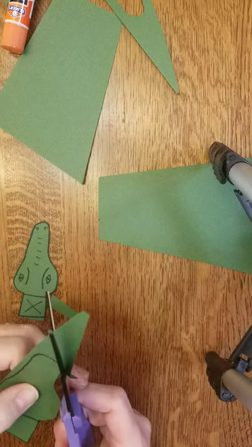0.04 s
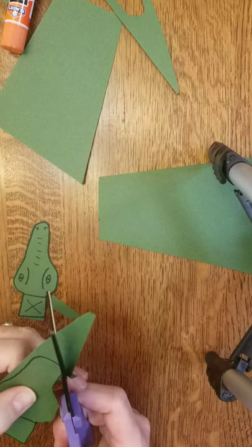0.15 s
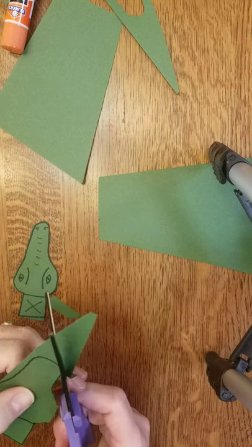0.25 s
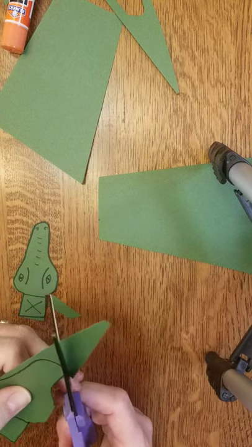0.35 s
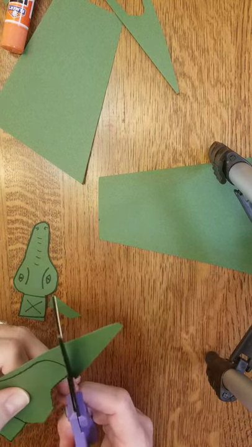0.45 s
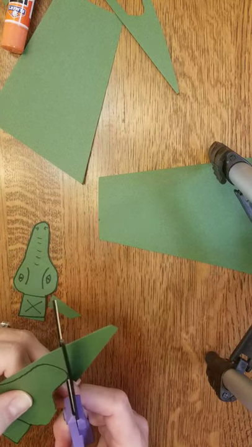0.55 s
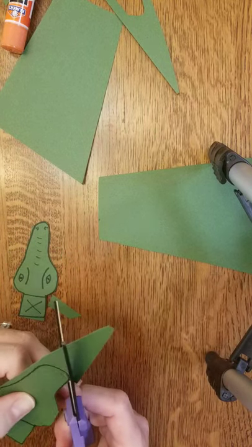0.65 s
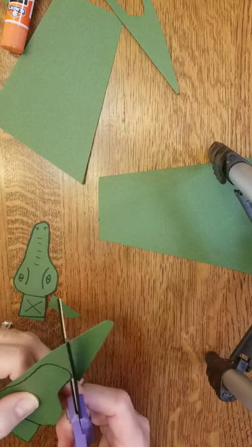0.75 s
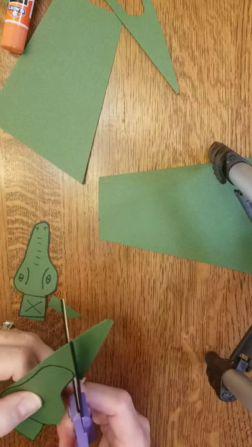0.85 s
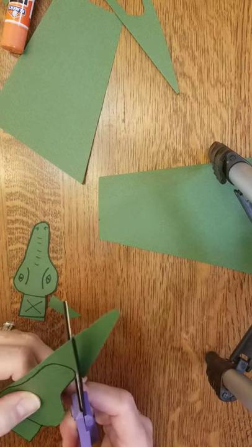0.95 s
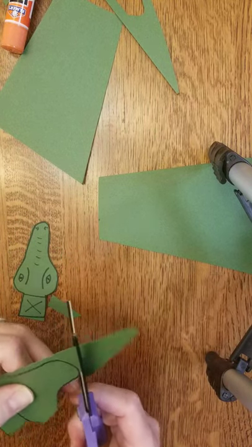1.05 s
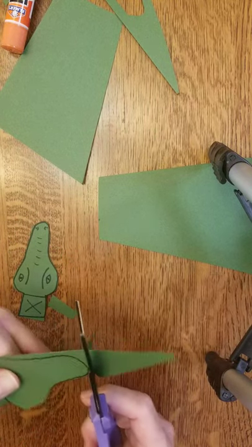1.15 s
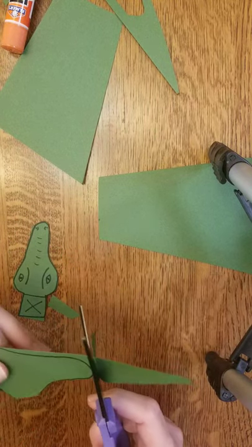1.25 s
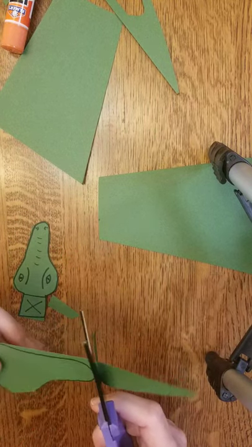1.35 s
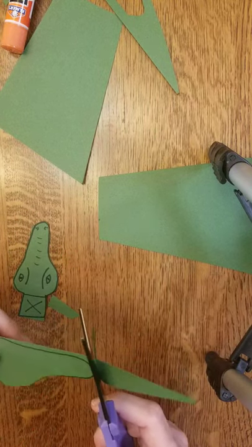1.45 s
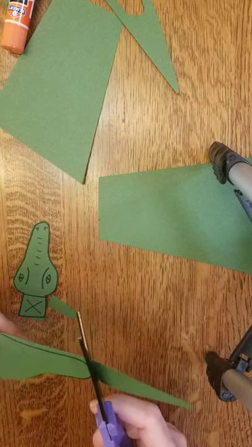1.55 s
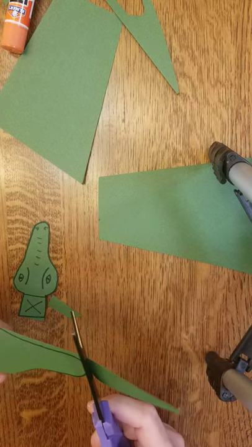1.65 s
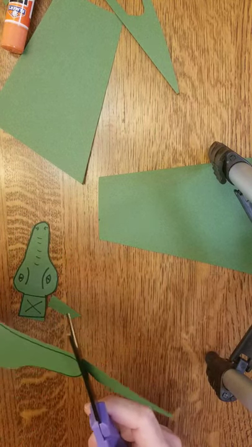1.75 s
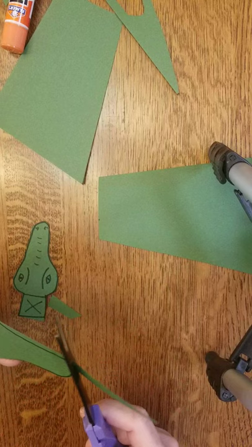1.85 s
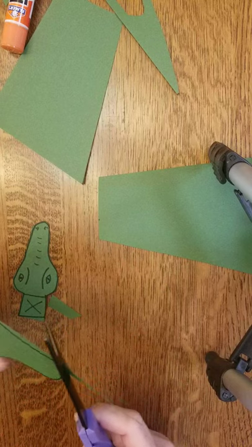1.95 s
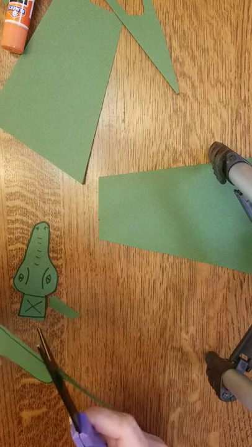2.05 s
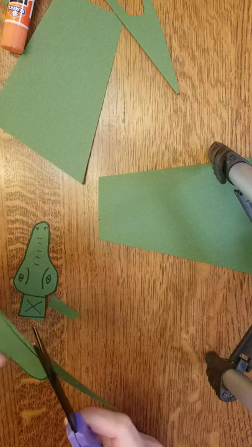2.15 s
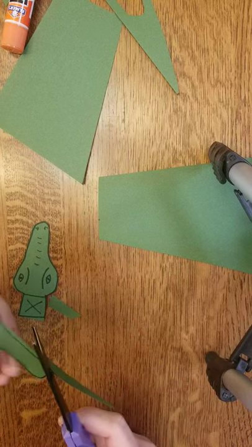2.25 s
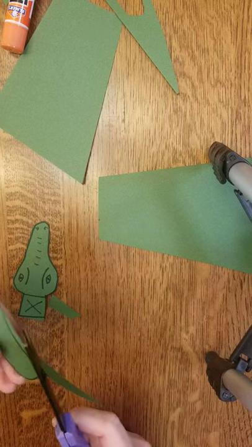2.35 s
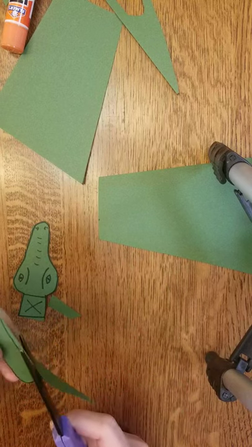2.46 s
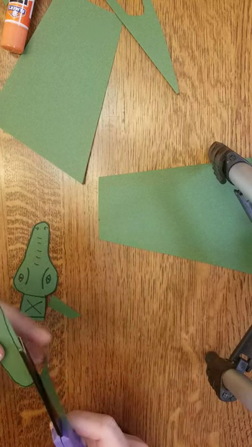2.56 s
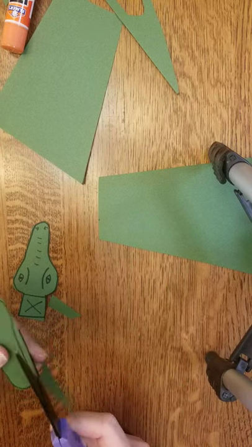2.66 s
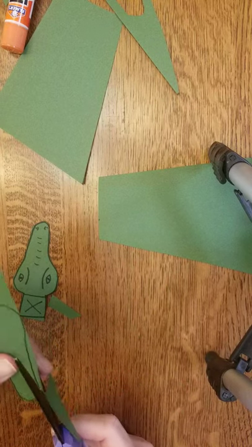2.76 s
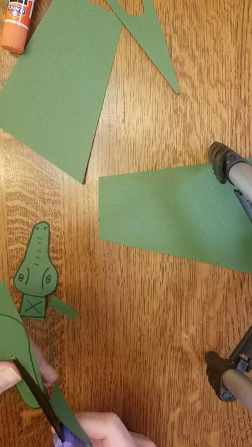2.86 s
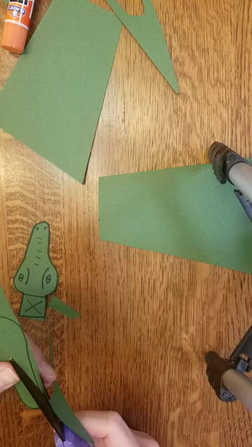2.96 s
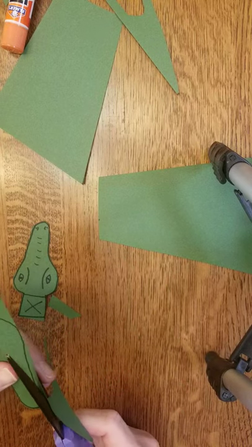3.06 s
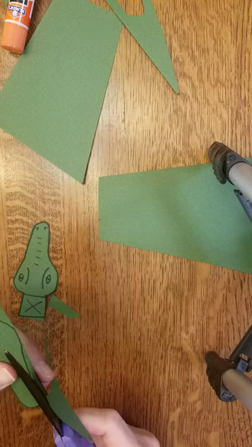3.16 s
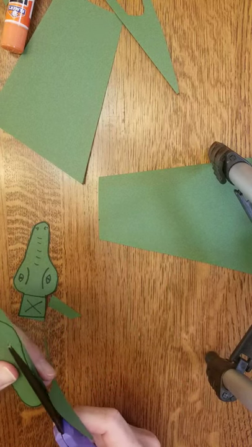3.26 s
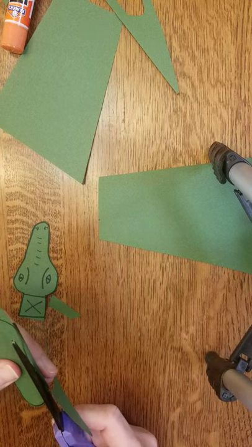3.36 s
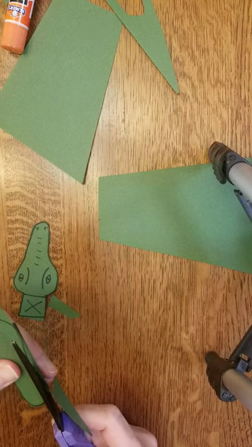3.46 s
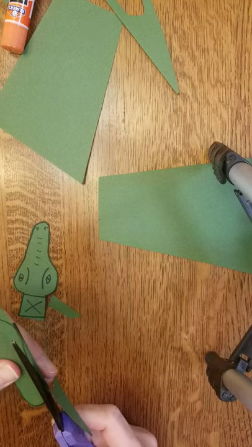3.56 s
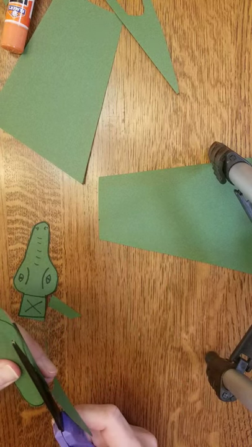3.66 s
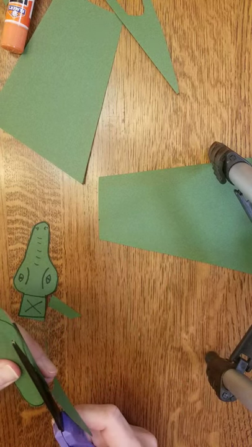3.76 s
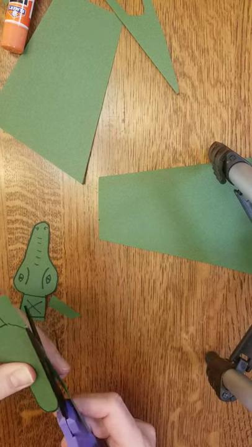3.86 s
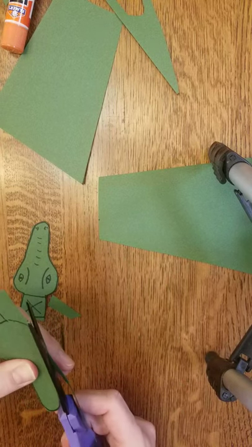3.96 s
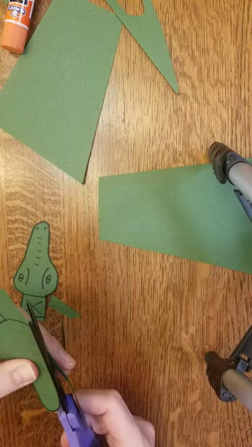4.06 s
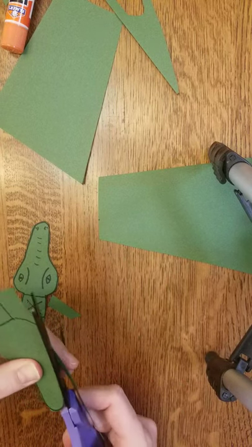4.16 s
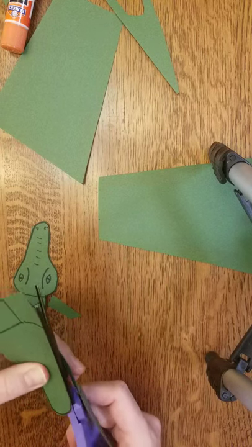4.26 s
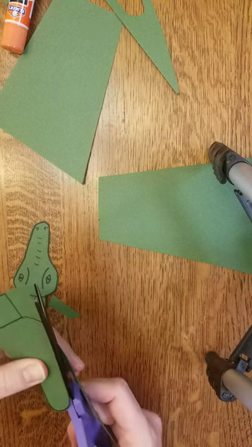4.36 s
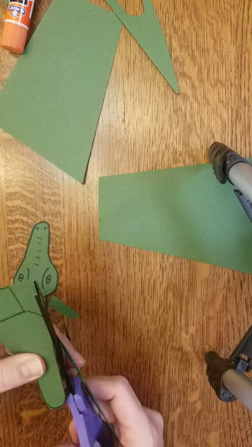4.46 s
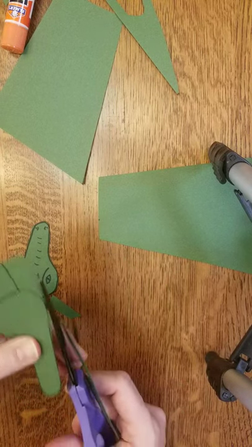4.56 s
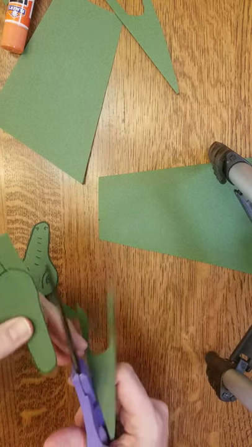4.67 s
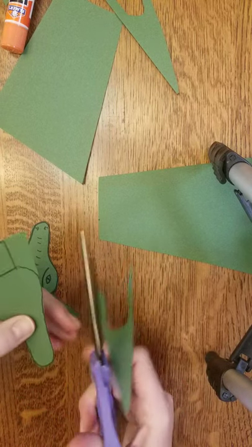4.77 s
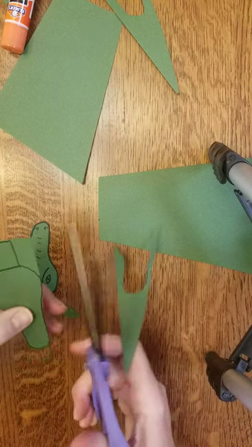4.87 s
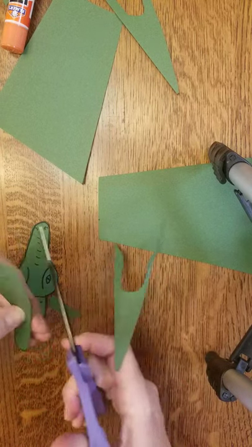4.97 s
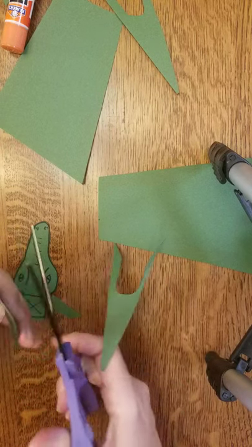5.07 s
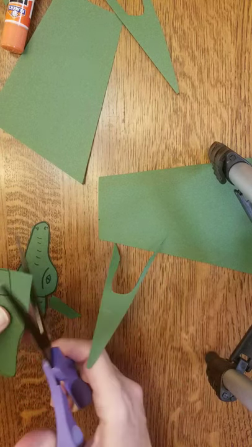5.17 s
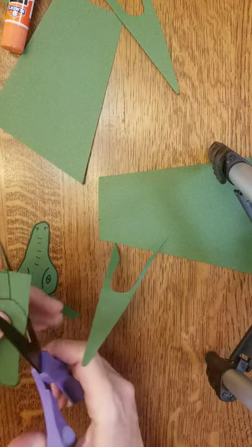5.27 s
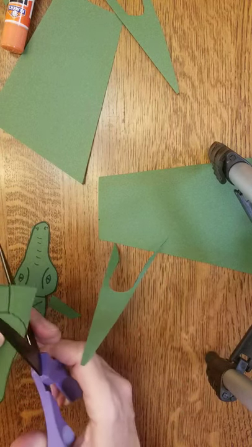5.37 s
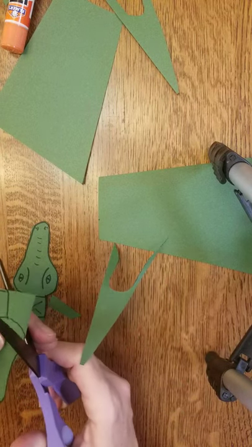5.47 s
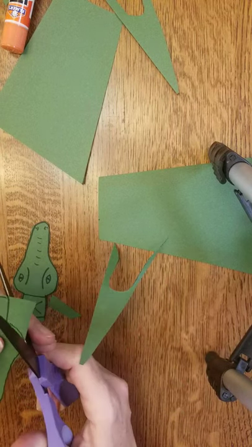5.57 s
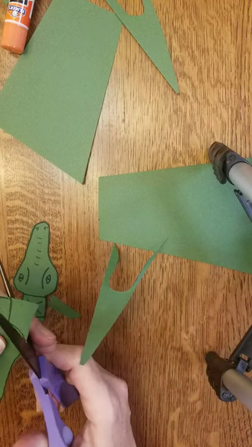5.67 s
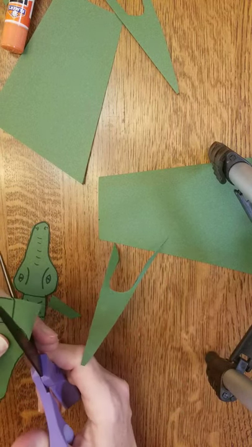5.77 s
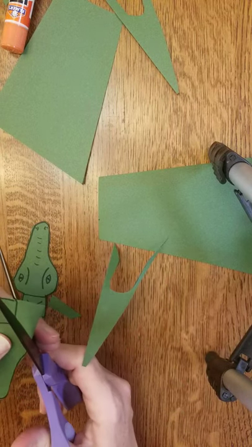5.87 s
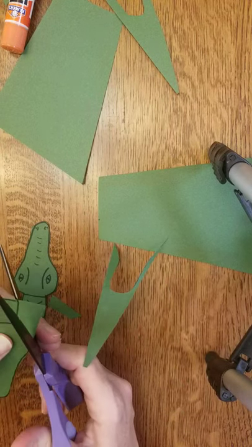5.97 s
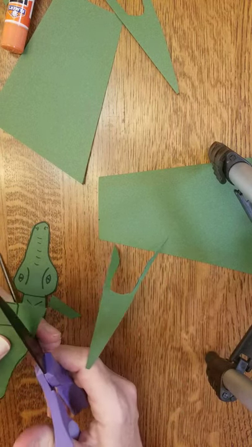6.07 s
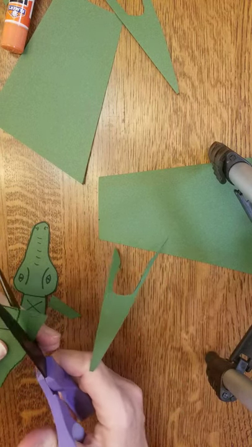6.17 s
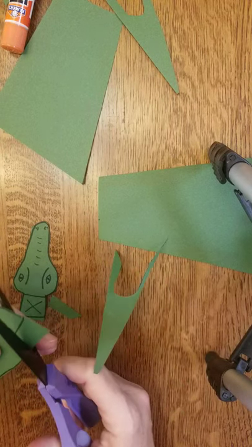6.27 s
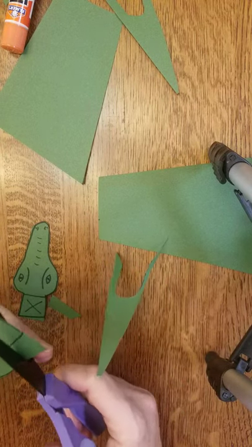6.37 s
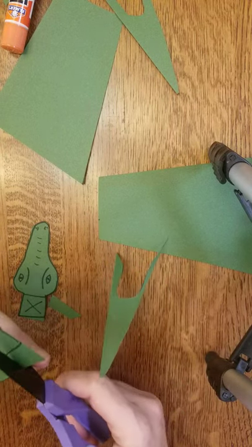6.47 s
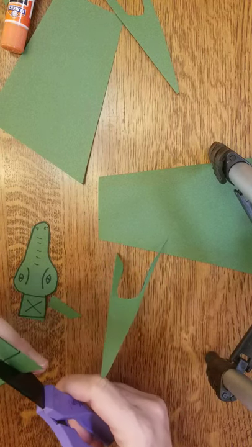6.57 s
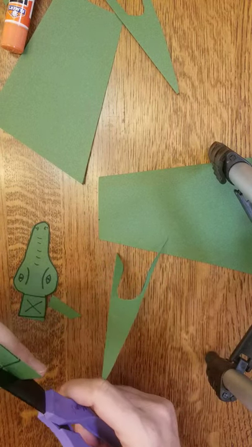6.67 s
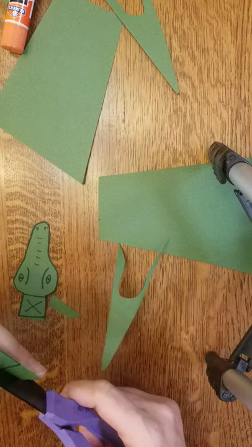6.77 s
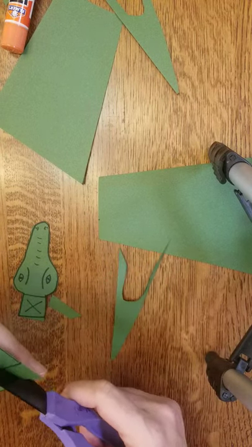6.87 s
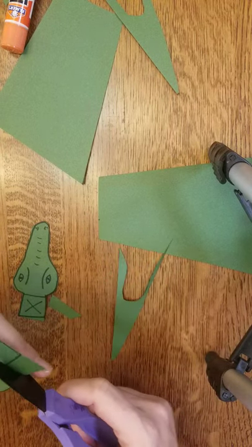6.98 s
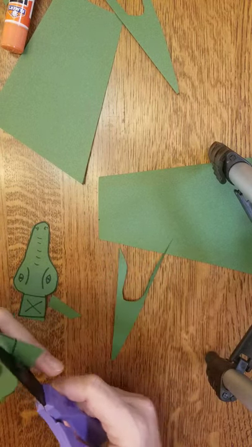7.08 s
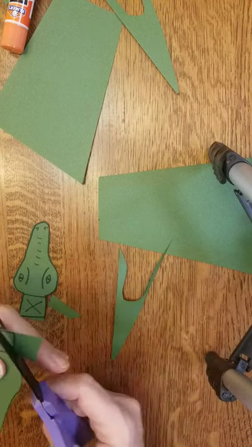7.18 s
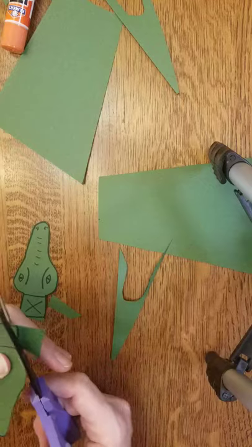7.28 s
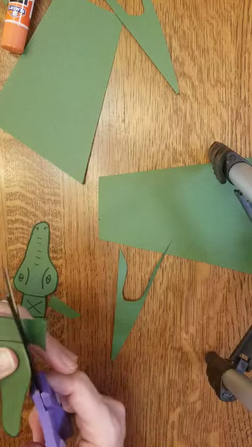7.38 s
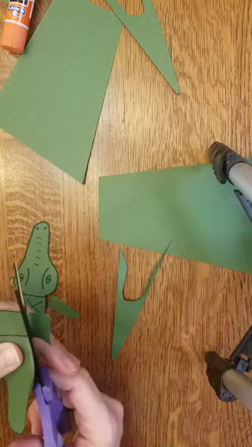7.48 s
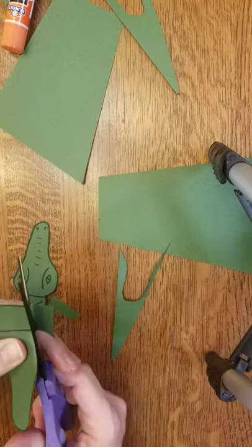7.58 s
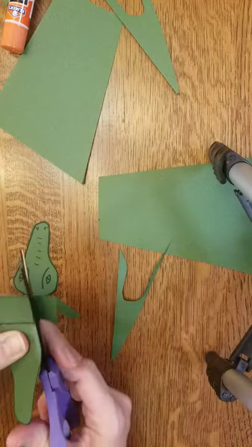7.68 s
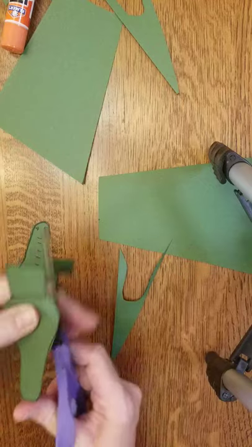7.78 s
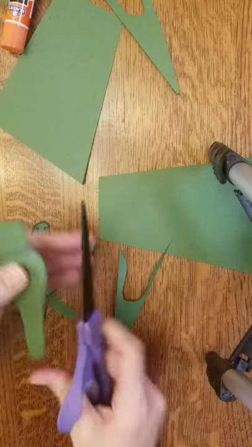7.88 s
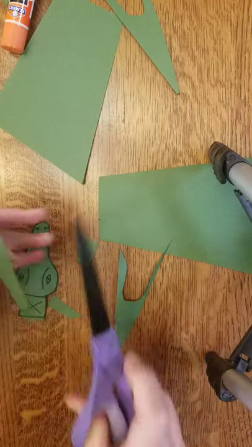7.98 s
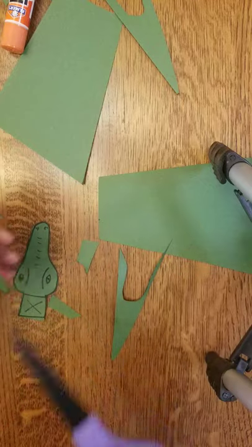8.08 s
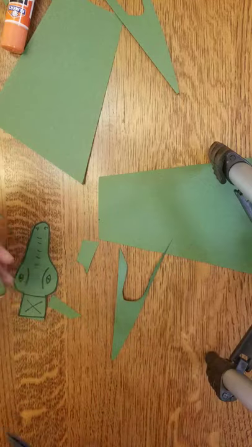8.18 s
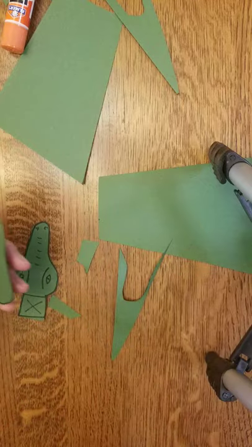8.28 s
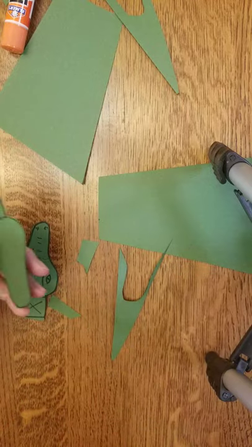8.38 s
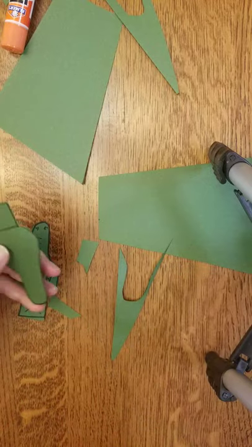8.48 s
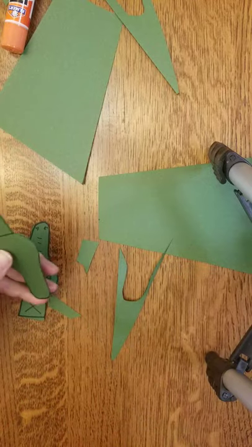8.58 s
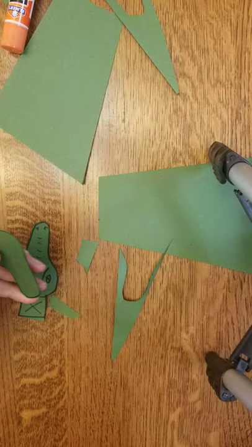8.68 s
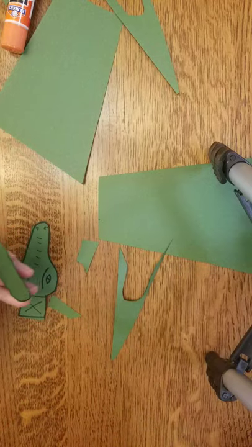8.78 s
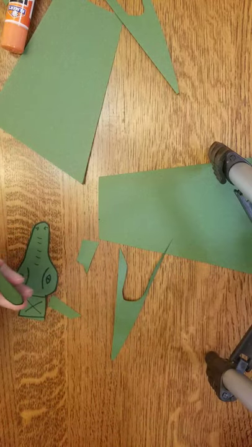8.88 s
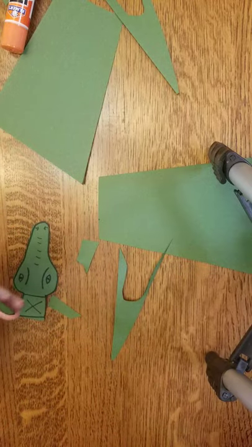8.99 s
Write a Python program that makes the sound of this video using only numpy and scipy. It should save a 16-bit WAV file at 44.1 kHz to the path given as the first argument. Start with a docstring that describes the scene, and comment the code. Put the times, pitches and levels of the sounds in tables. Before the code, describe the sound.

Close stereo pickup in a small, quiet room with a low motor hum and soft hiss. Scissors trim stiff craft paper slightly left of centre: crisp short snips, papery slides, finger strokes and small hollow pops as the sheet buckles. A dry click marks the blades shutting. After a pause and a last run of cuts, the scissors are laid on the wooden table with a knock and a much louder clatter, then a hand brushes the wood.

```python
"""A low hum and the faint rustle of a held sheet come first, in a small room; then scissors trim craft paper.
Short snips are dense clusters of snapping fibres; between them blades and fingers slide as shaped noise.
The sheet buckles with hollow pops made of short tones, and the blades shut with a dry click.
At the end the scissors are put down: a knock, then a louder clatter of noise bursts and ringing
table tones, and a hand brushes the table with a dull noise."""
import sys
import numpy as np
from scipy import signal
from scipy.fft import rfft, irfft
from scipy.io import wavfile

SR = 44100
rng = np.random.default_rng(int(sys.argv[2]) if len(sys.argv) > 2 else 0)


def unload_wav(signal):
    """Save mono or channel-first audio to the path in sys.argv[1] as 16-bit WAV at rate SR, clipped to [-1, 1]."""
    wavfile.write(
        sys.argv[1],
        SR,
        np.round(np.clip(np.atleast_2d(signal).T, -1, 1) * 32767).astype(np.int16),
    )


N = 397782
TIME = np.arange(N) / SR


def from_db(db):
    """Turn decibels into a gain."""
    return 10 ** (np.asarray(db) / 20)


def rms_one(x):
    """Scale a sound to an average power of 1."""
    return x / np.sqrt(np.mean(x ** 2) + 1e-20)


def in_time(rows):
    """Draw straight lines between the rows of a table, giving each column at every sample."""
    seconds, *columns = np.transpose(rows)
    return [np.interp(TIME, seconds, column) for column in columns]


def at_hz(points, hz):
    """Read a table between its rows, with pitch spaced as the ear hears it (logarithmically)."""
    f, value = np.transpose(points)
    return np.interp(np.log(np.maximum(hz, 1)), np.log(f), value)


def pan(left_db):
    """Gains of left and right that differ by this many dB; positive leans left."""
    return from_db(np.array([[left_db], [-left_db]]) / 2)


def band(x, low, high, order=3):
    """Keep only the range between two pitches in Hz."""
    sos = signal.butter(order, [low, min(high, .45 * SR)], "band", fs=SR, output="sos")
    return signal.sosfilt(sos, x)


def convolve(x, response):
    """Pass a sound through an impulse response, channel by channel."""
    return signal.fftconvolve(np.atleast_2d(x), np.atleast_2d(response), axes=1)[:, :N]


def colour(x, spectrum, size=4096):
    """Filter with the given spectrum, without sound ahead of time; white noise keeps its power."""
    hz = np.arange(size // 2 + 1) * SR / size
    cepstrum = irfft(np.log(from_db(at_hz(spectrum, hz))))
    # folding the cepstrum makes the filter respond as early as possible (minimum phase)
    cepstrum[1:size // 2] *= 2
    cepstrum[size // 2 + 1:] = 0
    response = irfft(np.exp(rfft(cepstrum)))
    return convolve(x, response / np.linalg.norm(response))


def drift(rate):
    """A random line with this many new targets per second and an average power of 1."""
    knots = np.arange(0, N / SR + 1, 1 / rate)
    return rms_one(np.interp(TIME, knots, rng.standard_normal(len(knots))))


def stereo_noise(likeness):
    """White noise; likeness is the share of power common to both channels."""
    shared = np.clip(likeness, 0, 1)
    common = np.sqrt(shared) * rng.standard_normal(N)
    return common + np.sqrt(1 - shared) * rng.standard_normal((2, N))


# Hum of a motor in the room. Each row: pitch in Hz, level in dB before wavering and panning.
HUM = [(59.4, -86), (118.8, -76.5), (150, -75.5), (180, -72.5), (210, -82.5), (239, -79.5), (571, -89.5),
       (1152, -93.5)]
# Colour of the room's rumble and hiss. Each row: pitch in Hz, relative level in dB per Hz.
ROOM_NOISE = [(20, -33), (50, 0.5), (100, -6.5), (170, -2.5), (240, -5), (330, -13.5), (550, -18.5),
              (850, -24.5), (1100, -21), (1700, -24), (3200, -24), (6000, -32.5), (9000, -48),
              (13000, -19.5), (16000, -28.5)]


def background(waver_db=3.0, noise_db=-67, split_hz=900):
    """Steady tones waver in level and phase over a shared rumble and a hiss that differs on each side."""
    hum = 0
    for hz, db in HUM:
        level = from_db(db + waver_db * drift(6.2))
        phase = 2 * np.pi * hz * TIME + 0.82 * drift(4.4)
        hum = hum + level * np.sqrt(2) * np.sin(phase)
    low = signal.butter(2, split_hz, fs=SR, output="sos")
    high = signal.butter(2, split_hz, "high", fs=SR, output="sos")
    rumble = signal.sosfilt(low, stereo_noise(likeness=0.69)) * pan(13.0)
    hiss = signal.sosfilt(high, stereo_noise(likeness=0.038)) * pan(1.0)
    return hum * pan(13.2) + from_db(noise_db) * colour(rumble + hiss, ROOM_NOISE)


# Hands shifting on the table edge. Each row: time in seconds, level in dB before panning.
HANDLING = [(0, -76), (3.72, -76.5), (3.83, -60), (3.98, -71), (6.55, -91), (6.85, -67), (7.2, -68),
            (7.65, -58), (7.9, -65), (8.3, -65.5), (9.02, -65)]
# Colour of that rumble. Each row: pitch in Hz, relative level in dB per Hz.
HANDLING_COLOUR = [(30, 5), (55, 2.5), (110, 5.5), (200, -3.5), (400, -11), (650, -24.5), (2000, -45)]


def handling():
    """Hands and wrists rumble softly through the table, as dark noise that swells and fades."""
    level_db, = in_time(HANDLING)
    return from_db(level_db) * colour(stereo_noise(likeness=0.83), HANDLING_COLOUR) * pan(13.8)


# Time for the room to die away. Each row: pitch in Hz, time in seconds to fall by 60 dB.
ROOM_T60 = [(100, 0.58), (700, 0.79), (2500, 0.48), (6000, 0.39), (15000, 0.41)]


def room(x, first_echo_s=0.0081, alike_below_hz=400, count=9):
    """Blurred reflections start after the nearest wall, with their own decay in each pitch range;
    both sides are more alike in the bass."""
    age = TIME[:SR * 3 // 4]
    edges = np.geomspace(60, 18000, count)
    tail = 0
    for low, high in zip(edges, edges[1:]):
        hz = np.sqrt(low * high)
        noise = stereo_noise(likeness=1 / (1 + (hz / alike_below_hz) ** 2))[:, :len(age)]
        tail = tail + band(noise, low, high, order=2) * from_db(-60 * age / at_hz(ROOM_T60, hz))
    tail = tail * (age > first_echo_s)
    return convolve(x, tail / np.sqrt(np.sum(tail ** 2) / 2))


# A hand brushing the table top. Each row: time in seconds, level in dB before panning.
BRUSH = [(8.88, -72), (8.93, -52.5), (8.975, -47.5), (8.992, -49), (9.02, -54)]
# Colour of the brushing. Each row: pitch in Hz, relative level in dB per Hz.
BRUSH_COLOUR = [(100, -25), (220, 6), (300, 2.5), (620, 4), (900, -8), (2000, -14.5), (8000, -33)]


def brush():
    """A hand rubs over the wood, heard as dull noise."""
    level_db, = in_time(BRUSH)
    started = TIME > BRUSH[0][0]
    return from_db(level_db) * started * colour(stereo_noise(likeness=0.31), BRUSH_COLOUR)


# Scissors landing on the table. Each row: start in seconds, then relative levels in dB of the crack,
# the ringing, the thud (added to the lowest ringing tones) and the tick of steel.
KNOCKS = [(8.372, -3, -8.5, 10, 2), (8.4054, -3.5, -9, 2, -11), (8.426, -10, -16.5, 14.5, -10),
          (8.574, 2, -3, 1.5, -9), (8.586, -3.5, 4, -5, -10), (8.594, 6.5, -2.5, 0, -6),
          (8.599, -2.5, -31, -5, -10), (8.614, -9, -6.5, 7.5, -23), (8.634, -20, -7.5, -1, -30),
          (8.665, -9, -5, -18, -32)]
# Tones of the table top with the scissors on it.
# Each row: pitch in Hz, relative level in dB, time in seconds to fall by 60 dB.
TABLE_MODES = [(57.5, -44, .9), (87, -39, .4), (106, -45, .4), (122, -46, .35), (144, -44, .4),
               (170, -45, .5), (207, -45, .4), (238, -45, .35), (300, -47, .35), (347.5, -44, .5),
               (414.5, -46, .6), (511, -45, .4), (562, -38, .42), (609.5, -40, .38), (663, -37, .44),
               (706, -37, .42), (845, -43, .55), (1051, -41, .36), (1141, -46, .45), (1242, -45, .45),
               (1362, -46, .37), (1491, -46, .34), (1572, -37, .49), (1610, -43, .42), (2268, -43, .42),
               (2385, -46, .38), (2599, -43, .3), (3204, -44, .35), (3760, -48, .25)]
# Colours of the crack and the tick. Each row: pitch in Hz, relative level in dB per Hz.
CRACK_COLOUR = [(100, 1), (650, -0.5), (1100, -3), (1650, 4), (1950, -4.5), (2400, 8.5), (2900, -7),
                (3200, 3.5), (3500, -9), (4000, 0), (5200, -9), (6900, -8.5), (9000, -20), (15000, -31)]
TICK_COLOUR = [(1500, -17), (4000, -4), (5500, -7), (7000, -1), (8500, -9.5), (12000, -2), (16000, -11)]


def knocks(crack_db=-20, crack_s=0.0022, rattle_db=-35, rattle_s=0.0077,
           tick_db=-23, tick_s=0.0014, thud_below_hz=280):
    """Each landing cracks, ticks and rattles briefly, and rings the table top. Returns clatter and ringing."""
    # contact and tick add up as power
    contact, tick, rings = np.zeros(N), np.zeros(N), np.zeros((2, N))
    hz, mode_db, t60 = np.transpose(TABLE_MODES)[:, :, None]
    # low tones move both channels alike, higher ones reach them out of step
    offset = (-1) ** np.arange(len(hz))[:, None] * np.minimum(hz / 1100, .85)
    for s, level_db, ring_db, thud_db, steel_db in KNOCKS:
        start = int(s * SR)
        age = TIME[:N - start]
        contact[start:] += (from_db(level_db + crack_db) * np.exp(-age / crack_s)) ** 2
        contact[start:] += (from_db(level_db + rattle_db) * np.exp(-age / rattle_s)) ** 2
        tick[start:] += (from_db(steel_db + tick_db) * np.exp(-age / tick_s)) ** 2
        start_db = ring_db + mode_db + thud_db * (hz < thud_below_hz) + rng.normal(0, 1, hz.shape)
        strength = from_db(start_db - 60 * age / t60)
        # the spot that is struck decides which way each tone starts; here that is random
        strength = strength * rng.choice([-1, 1], hz.shape)
        for channel, side in enumerate((1, -1)):
            tones = strength * np.sin(2 * np.pi * hz * age + side * offset)
            rings[channel, start:] += np.sum(tones, axis=0)
    crack = colour(np.sqrt(contact) * stereo_noise(likeness=0.24), CRACK_COLOUR)
    steel = colour(np.sqrt(tick) * stereo_noise(likeness=0.32), TICK_COLOUR)
    return crack * pan(6.0) + steel * pan(3.5), rings * pan(4.8)


# Resonances that the juddering scissors keep alive.
# Each row: pitch in Hz, width in Hz, relative level in dB, decay in seconds (to about a third).
JUDDER = [(380, 160, -7, 0.056), (658, 160, -0.5, 0.081), (1050, 300, -4, 0.076), (1593, 50, -2.5, .075),
          (2320, 340, -7, 0.067)]


def shudder(level_db=-35):
    """After each landing the loose scissors judder on the wood, as narrow noise that dies away."""
    out, noise = 0, stereo_noise(likeness=0.11)
    landings = np.zeros(N)
    for s, _, ring_db, _, _ in KNOCKS:
        landings[int(s * SR)] = from_db(ring_db + level_db) ** 2
    for hz, width, db, decay_s in JUDDER:
        power = signal.lfilter([1], [1, -np.exp(-2 / (decay_s * SR))], landings)
        resonance = rms_one(band(noise, hz - width / 2, hz + width / 2, order=2))
        out = out + from_db(db) * np.sqrt(power) * resonance
    return out


# Smooth strokes of fingers along the sheet.
# Each row: centre in seconds, length in seconds, level in dB before panning, pitch of the hiss in Hz.
STROKES = [(0.137, .15, -78, 1400), (.65, 0.16, -75.5, 2900), (1.447, 0.083, -66, 1340),
           (1.593, 0.081, -56, 2810), (2.11, 0.16, -59.5, 5260), (2.14, .12, -70, 990),
           (2.629, 0.083, -61.5, 2580), (3.238, 0.072, -54.5, 3930), (3.612, 0.066, -57.5, 4840),
           (3.806, 0.065, -58, 885), (4.148, 0.11, -64, 960), (4.339, 0.029, -63.5, 930),
           (4.842, 0.049, -50.5, 5600), (5.798, 0.15, -65, 4800), (6.542, 0.048, -48.5, 4500),
           (6.55, 0.065, -66, 945), (6.813, 0.089, -64, 4840), (8.006, 0.11, -74, 7360),
           (8.152, 0.32, -73, 4430)]


def swell(centre, length):
    """A bell-shaped burst, at half its height at both ends of the length."""
    return 1 / (1 + ((TIME - centre) / (0.5 * length)) ** 4)


def strokes(width=1.202):
    """Skin gliding over paper hisses in one broad band."""
    noise = stereo_noise(likeness=0.32)
    out = 0
    for centre, length, db, hz in STROKES:
        hiss = rms_one(band(noise, hz / width, hz * width, order=2))
        out = out + from_db(db) * swell(centre, length) * hiss
    return out


# The stiff sheet buckling with a hollow pop. Each row: start in seconds, relative level in dB, pitch in Hz.
BUCKLES = [(.719, -59, 860), (1.09, -39, 1904), (1.322, -35, 2220), (3.787, -41, 850), (4.312, -45.5, 950),
           (4.725, -46.5, 1380), (4.731, -49.5, 770), (4.935, -47.5, 1260), (6.513, -52, 900),
           (6.571, -52, 910)]


def buckles(t60=0.041, split=1.144, level_db=-2):
    """A buckle sets a close pair of sheet tones ringing briefly."""
    out = np.zeros(N)
    age = TIME[:SR // 10]
    for s, db, hz in BUCKLES:
        start = int(s * SR)
        pair = np.sin(2 * np.pi * hz * age) - .5 * np.sin(2 * np.pi * hz * split * age)
        out[start:start + len(age)] += from_db(db + level_db - 60 * age / t60) * pair
    return out


# Colour of the closing click. Each row: pitch in Hz, relative level in dB per Hz.
SHUT_COLOUR = [(300, -10), (1200, -8), (2200, -5), (3200, 3), (4200, -6), (7000, -10), (16000, -22)]


def shut(start_s=4.9135, level_db=-38.5, decay_s=0.0027):
    """The blades meet their stop at the end of the long cut, with one dry click of fading noise."""
    age = TIME - start_s
    fade = (age > 0) * np.exp(-np.abs(age) / decay_s)
    return from_db(level_db) * colour(fade * stereo_noise(likeness=0.48), SHUT_COLOUR)


# Pitch ranges of flap, body, rasp and hiss of the paper. Each row: low edge in Hz, high edge in Hz.
PAPER_BANDS = [(400, 1500), (1500, 3500), (3500, 8000), (8000, 16000)]


def fibres(per_s, spread_db, spectrum, likeness=0.2, count=2):
    """Fibres snap at random with uneven force, unequally to both sides; gives one signal per paper range."""
    force = from_db(spread_db * np.minimum(rng.exponential(1, N), 4))
    snaps = rng.random(N) < per_s / SR
    left, right = force * snaps * stereo_noise(likeness)
    # the left microphone is a few samples further away
    crackle = colour([np.roll(left, count), right], spectrum)
    return [rms_one(band(crackle, low, high)) for low, high in PAPER_BANDS]


# How strongly brightness tilts flap, body, rasp and hiss: one factor for each.
BAND_TILT = [-0.3, -1.15, -0.018, 0.89]


def band_levels(level_db, brightness, balance_db):
    """Gains of the four paper ranges, as a column."""
    return from_db(level_db + np.array(balance_db) + brightness * np.array(BAND_TILT))[:, None]


# Blades and paper sliding on each other as the scissors close or open; the last row is a dull rustle after the
# scissors land. # Each row: start in seconds, length in seconds, relative level in dB, brightness in dB per
# tilt step (scaled by BAND_TILT).
SLIDES = [(.1, 0.071, -71, 1), (0.707, 0.048, -57, 0.5), (.84, 0.4, -69, 5.5), (1.03, 0.077, -62, -4),
          (1.315, 0.25, -63, -0.5), (1.53, 0.21, -62, -0.5), (1.711, 0.15, -61.5, 3.5),
          (2.047, .14, -58, 2), (2.275, 0.21, -59.5, 3), (2.54, 0.1, -59, 3), (2.835, .18, -59.5, 3),
          (3.178, 0.068, -55, 2), (3.359, 0.17, -62, -1), (3.569, 0.084, -61, 0), (3.745, 0.066, -54, 1),
          (3.903, 0.13, -57.5, 2), (4.105, 0.18, -64.5, 4.5), (4.3, 0.28, -59.5, 3.5),
          (4.594, 0.074, -59, 7.5), (4.719, 0.051, -55.5, 4.5), (4.807, 0.066, -56, 6.5),
          (4.894, 0.11, -59.5, 0.5), (5.051, 0.052, -56.5, -0.5), (5.245, 0.084, -69.5, -2),
          (5.767, 0.19, -64, 1.5), (6.018, 0.1, -69, 0), (6.23, 0.052, -62.5, -0.5), (6.425, 0.035, -68, 3),
          (6.51, 0.1, -58.5, 2.5), (6.757, 0.19, -65, 1), (7.39, 0.17, -52.5, 1), (7.6, 0.12, -66.5, 3.5),
          (8.044, 0.084, -72, 12.5), (8.715, 0.18, -56.5, -1)]
# The faint rustle of the sheet being held and turned. Each row: time in seconds, relative level in dB.
GRIP = [(0, -80.5), (.6, -86), (.8, -74.5), (3.7, -74), (5.0, -70), (5.5, -79.5), (6.0, -75), (7.2, -81),
        (7.8, -76.5), (8.3, -70), (9.02, -65.5)]
# Balance of a slide and of the held sheet: relative levels in dB of flap, body, rasp and hiss.
SLIDE_BANDS_DB = [-9.5, -1.5, .5, 0]
GRIP_BANDS_DB = [-4.5, -2, 0.5, 0.5]


def slide_envelopes(attack_s=0.0093, release_s=0.03, sag_db_per_s=9.5):
    """Each slide swells, sags and dies away over the rustle of the grip; one envelope per paper range."""
    grip_db, = in_time(GRIP)
    power = (band_levels(0, 0, GRIP_BANDS_DB) * from_db(grip_db)) ** 2
    for s, length, level_db, brightness in SLIDES:
        start = int(s * SR)
        age = TIME[:min(SR, N - start)]
        shape = (1 - np.exp(-age / attack_s)) * np.exp(-np.maximum(age - length, 0) / release_s)
        shape = shape * from_db(-sag_db_per_s * age)
        levels = band_levels(level_db, brightness, SLIDE_BANDS_DB)
        power[:, start:start + len(age)] += (levels * shape) ** 2
    return np.sqrt(power)


def catches(per_s=22, catch_db=-3.0, decay_s=0.004):
    """The edge catches on the paper at random; each catch lifts the friction for a moment."""
    jolts = (rng.random(N) < per_s / SR) * rng.random(N)
    # the tiny constant keeps the filter away from vanishingly small numbers
    lift = signal.lfilter([1], [1, -np.exp(-1 / (decay_s * SR))], jolts + 1e-18)
    return 1 + from_db(catch_db) * lift


# Colour of the fine friction. Each row: pitch in Hz, relative level in dB per Hz.
SLIDE_COLOUR = [(300, -14), (550, -11), (950, -13), (1550, -16), (1950, -1), (2350, 2), (2900, -3),
                (3600, -3.5), (4300, -3), (5400, 0.5), (7000, -3.5), (8900, -15), (11400, -8),
                (16000, -7.5)]
# Colour of coarse crackles and of the bites. Each row: pitch in Hz, relative level in dB per Hz.
SNIP_COLOUR = [(300, -16.5), (900, -12), (1500, -11.5), (1900, -2), (2300, 11), (2750, 3), (3300, -7),
               (4300, -2), (5500, 1), (7000, -5.5), (8800, -17.5), (10500, -8.5), (13000, -8), (16000, -9)]


def sliding(gain_db=-2.0, flutter_db=1.86, coarse_db=-4, patchy_db=1.2):
    """Fine friction with fewer, coarser crackles; the grip flutters, the edge catches
    and the colour shifts as the sheet bends."""
    fine = np.array(fibres(per_s=14000, spread_db=-0.5, spectrum=SLIDE_COLOUR))
    coarse = np.array(fibres(per_s=600, spread_db=1.8, spectrum=SNIP_COLOUR))
    grains = fine + from_db(coarse_db) * coarse
    rustle = 0
    for envelope, grain in zip(slide_envelopes(), grains):
        rustle = rustle + envelope * grain * from_db(patchy_db * drift(25))
    return rustle * catches() * from_db(gain_db + flutter_db * drift(90))


# Blades biting through the sheet. # Each row: centre in seconds, length in seconds, relative level in dB,
# brightness in dB per tilt step (scaled by BAND_TILT).
SNIPS = [(.69, .004, -59.5, 5), (.721, 0.0088, -45.5, 0.5), (0.764, 0.0074, -54, 1.5),
         (1.082, .003, -50, 4), (1.094, 0.01, -47, 3.5), (1.125, 0.0036, -50.5, -1),
         (1.325, 0.0084, -47, 6.5), (1.362, 0.01, -44, 0.5), (1.424, 0.0063, -43, 0),
         (1.455, 0.0043, -50.5, 1.5), (1.506, .008, -51.5, 3), (1.779, 0.016, -56.5, 4.5),
         (2.195, .009, -54.5, 4.5), (2.297, 0.011, -52, 5.5), (2.347, 0.012, -54, 4),
         (2.439, 0.0074, -53.5, 9), (2.927, 0.0085, -51.5, 4.5), (3.009, .005, -53.5, 1.5),
         (3.058, 0.0074, -51.5, 0.5), (3.082, .009, -54, 0.5), (3.424, 0.016, -49, -0.5),
         (3.457, 0.009, -48, -0.5), (3.52, 0.0044, -54.5, -1), (3.79, 0.0062, -41.5, -0.5),
         (4.123, 0.022, -57, 4.5), (4.15, 0.013, -54.5, 2), (4.315, 0.0044, -43, 2),
         (4.727, 0.0052, -46, 2), (4.936, 0.0085, -54.5, -1), (6.057, 0.0053, -53, -1),
         (6.235, .007, -55.5, 1.5), (6.26, 0.0052, -52.5, -1), (6.513, .005, -41.5, 1),
         (6.52, 0.0099, -44, -1), (6.574, 0.0079, -46.5, 1), (6.633, .005, -52, 8),
         (6.831, 0.0034, -54.5, 3.5), (7.341, 0.0053, -58, 5.5), (7.37, 0.0087, -53, 5),
         (7.391, 0.0072, -45.5, 5), (7.422, 0.0054, -47.5, 2.5), (7.491, 0.024, -43, 3.5),
         (7.516, 0.011, -40, 0), (7.574, 0.013, -50.5, -1), (7.654, 0.0054, -52, 11)]
# Balance of a bite: relative levels in dB of flap, body, rasp and hiss.
SNIP_BANDS_DB = [-12, 0, 1, 2.5]


def snips():
    """Each bite of the blades bursts a dense cluster of fibres, rising and falling within milliseconds."""
    envelopes = np.zeros((len(PAPER_BANDS), N))
    for centre, length, level_db, brightness in SNIPS:
        near = slice(int((centre - .05) * SR), int((centre + .05) * SR))
        away = np.abs(TIME[near] - centre) / max(length / 2, 1e-4)
        # a rounded top with exponential flanks
        fall = np.minimum(away ** 2, 2 * away)
        burst = from_db(-4.0 * fall)
        envelopes[:, near] += (band_levels(level_db, brightness, SNIP_BANDS_DB) * burst) ** 2
    grains = fibres(per_s=11000, spread_db=3.5, spectrum=SNIP_COLOUR)
    return sum(np.sqrt(power) * grain for power, grain in zip(envelopes, grains))


# Extra path of the echo off the table as the hands move. Each row: time in seconds, path in metres.
ECHO_PATH = [(0, 0.17), (1.15, 0.24), (2.1, 0.19), (3.05, 0.23), (4.6, 0.1724), (6.4, 0.23), (7.5, 0.19)]


def table_echo(x, strength=0.18, side_shift=0.089):
    """The far face of the sheet sounds in opposite phase; its echo off the table weakens some pitches
    and lifts others, shifting with the hands."""
    path, = in_time(ECHO_PATH)
    delay = path / 343  # speed of sound in metres per second
    # the right channel hears the echo slightly later
    echo = [np.interp(TIME - delay * (1 + side * side_shift), TIME, channel)
            for side, channel in zip((0, 1), x)]
    return (x - strength * np.array(echo)) / np.sqrt(1 + strength ** 2)


def scene(paper_room_db=-12, clatter_room_db=-4, ring_room_db=-15):
    """Paper and scissors are close by and to the left, with room reflections and background."""
    cutting = table_echo(snips() * pan(3.4) + sliding() * pan(5.6))
    paper = cutting + (strokes() + buckles() + shut()) * pan(4.2)
    clatter, rings = knocks()
    to_room = from_db(paper_room_db) * paper + from_db(clatter_room_db) * clatter
    reflections = room(to_room + from_db(ring_room_db) * rings)
    landing = clatter + rings + shudder() * pan(5.7)
    return paper + landing + reflections + brush() * pan(6.3) + handling() + background()


def record(dry, bass_cut_hz=42, top_cut_hz=15800):
    """The microphone loses the deep bass; the top is cut steeply."""
    thin = signal.sosfilt(signal.butter(4, bass_cut_hz, "high", fs=SR, output="sos"), dry)
    return signal.sosfilt(signal.ellip(10, .2, 70, top_cut_hz, fs=SR, output="sos"), thin)


dry = scene()
out = record(dry)
unload_wav(out)
```